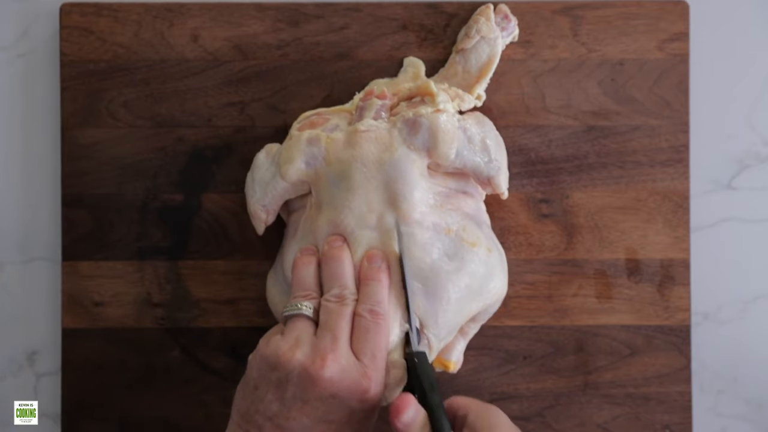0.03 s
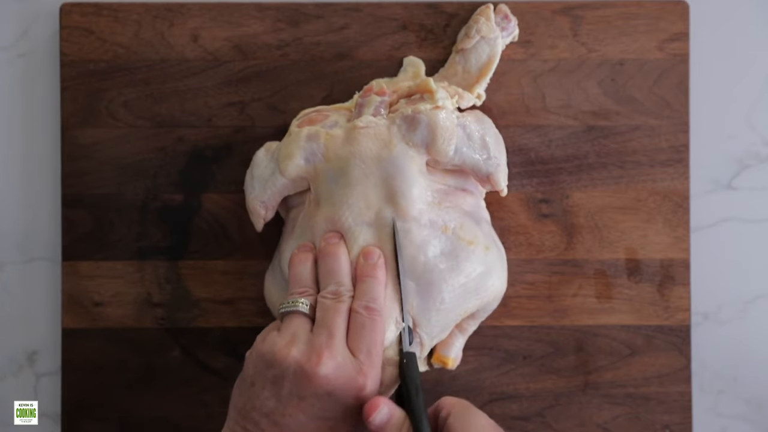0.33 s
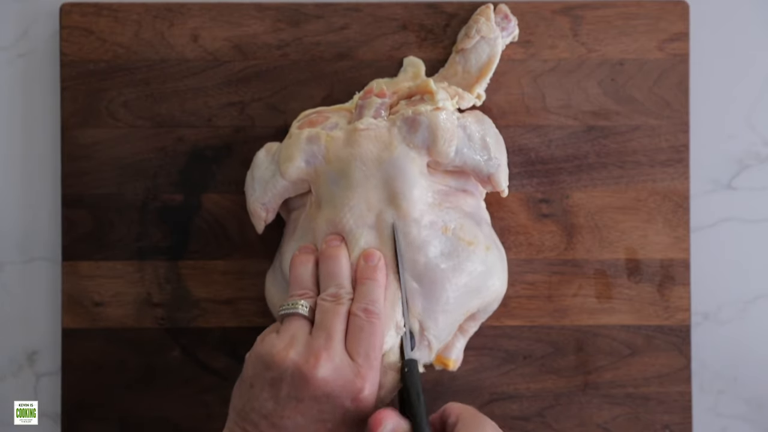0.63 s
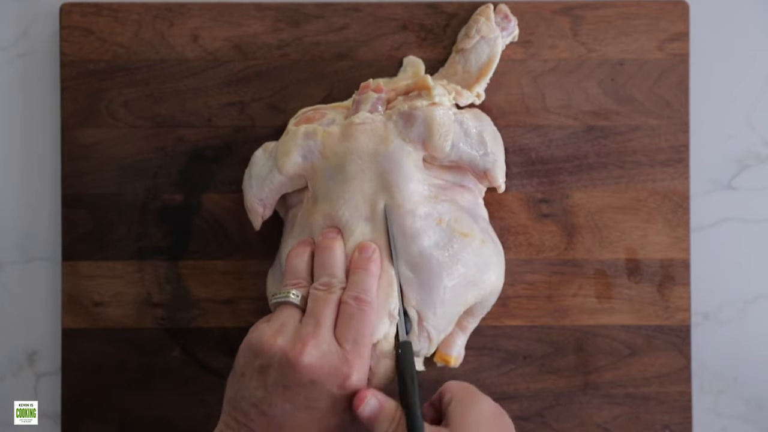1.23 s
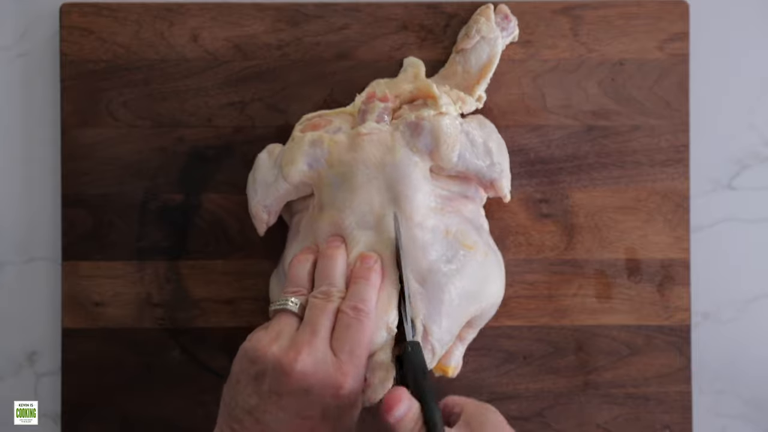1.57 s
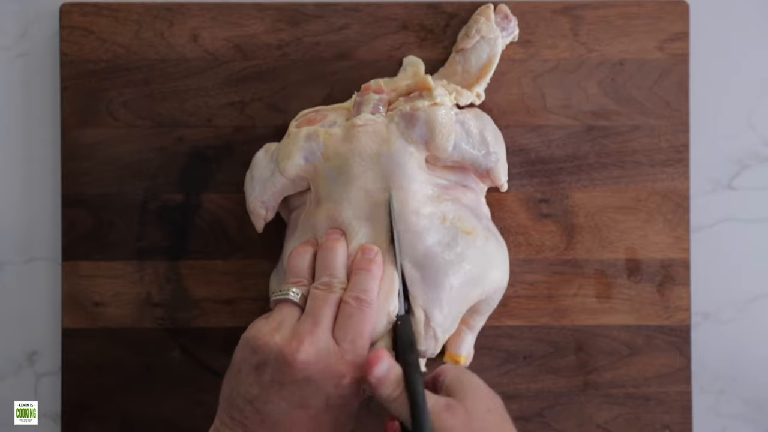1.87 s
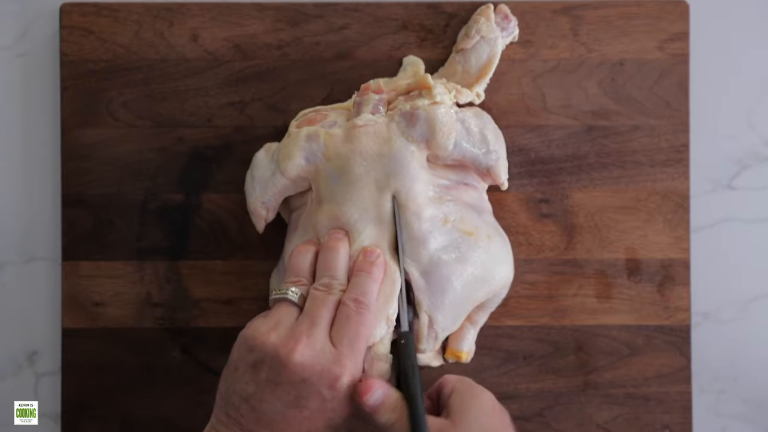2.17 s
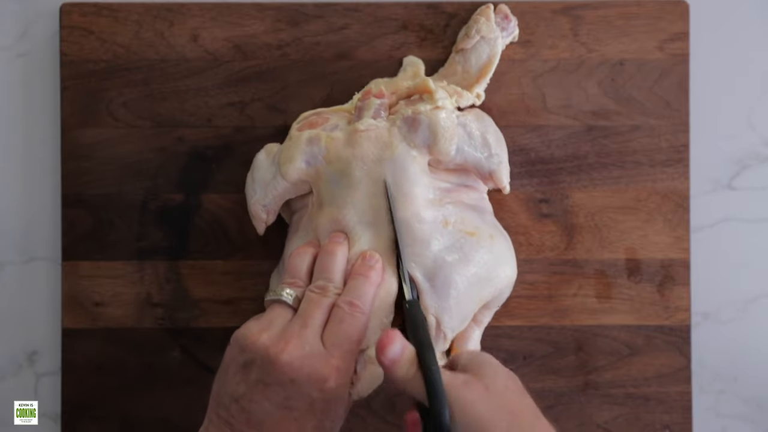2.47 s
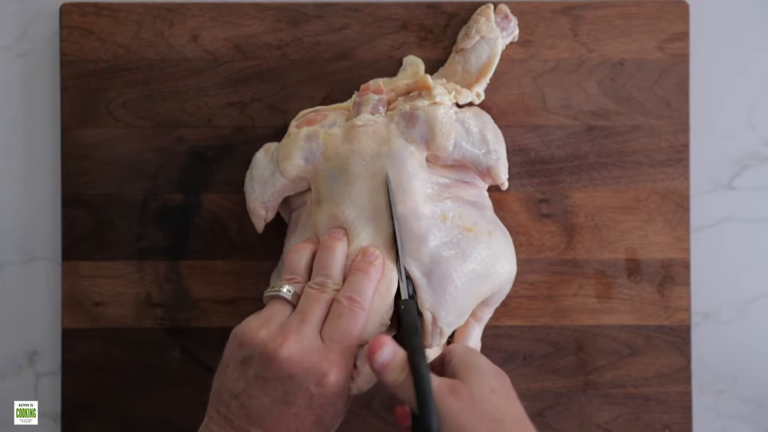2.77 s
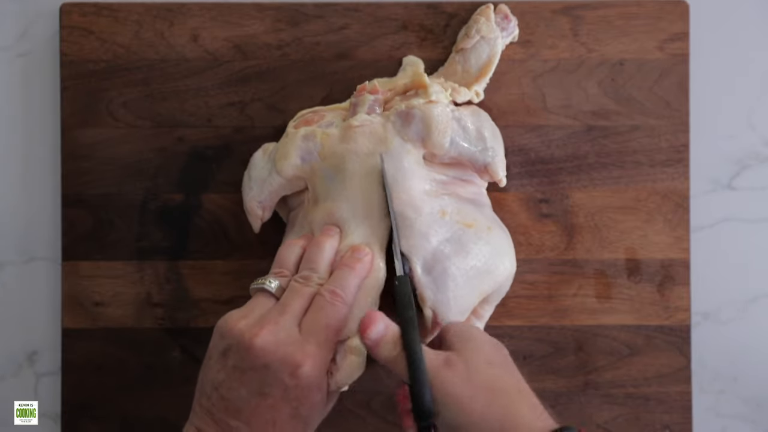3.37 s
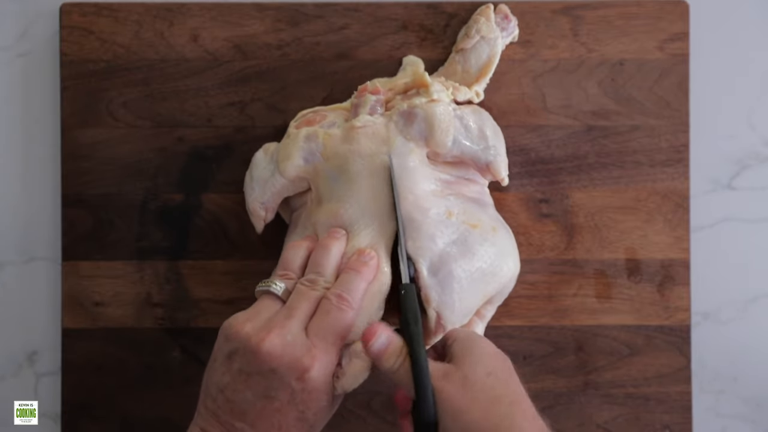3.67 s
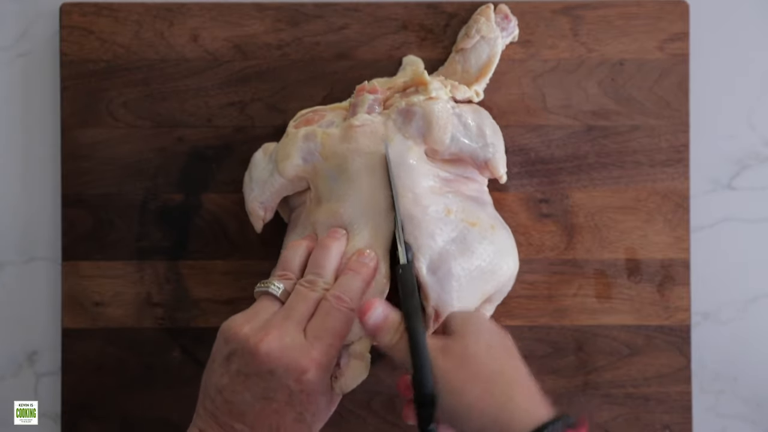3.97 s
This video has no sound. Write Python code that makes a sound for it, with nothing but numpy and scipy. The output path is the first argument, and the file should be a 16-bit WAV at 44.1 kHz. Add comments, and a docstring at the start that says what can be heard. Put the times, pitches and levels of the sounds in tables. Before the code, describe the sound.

Close, irregular snaps and crunches of shears cutting through the bones of a raw chicken.

```python
"""Kitchen shears cut along the backbone of a raw chicken on a wooden board, close by, over a low hum.
From the start ribs snap singly or in crunching runs; each break excites the hollow carcass, whose
pitch rises as the cut opens, and a small kitchen reverberates. Between bites wet skin squelches and
the bird rubs on the wood. Near 1.9 s a bent joint creaks, at 2.6 s the blades rasp through skin,
and from 3.85 s they grind through thick bone by stick-slip friction."""
import sys
import numpy as np
from scipy import signal
from scipy.fft import rfft, irfft
from scipy.io import wavfile

SR = 44100
rng = np.random.default_rng(int(sys.argv[2]) if len(sys.argv) > 2 else 0)


def unload_audio(sound):
    """Save the sound as a 16-bit wav file, at the path given as the first command line argument."""
    columns = np.transpose(np.atleast_2d(sound))
    # keep every value between -1 and 1, then stretch to whole-number steps
    steps = np.round(np.clip(columns, -1, 1) * 32767)
    wavfile.write(sys.argv[1], SR, steps.astype(np.int16))


N = 176400

# Resonances of bone, blades and spitting wet tissue: f/Hz, bandwidth/Hz, level/dB
BONE_MODES = [(1157, 530, -10), (1840, 210, -9.5), (2780, 501, 1.5), (3130, 499, 3), (3766, 490, -4)]
BLADE_MODES = [(4629, 370, 3), (5004, 1090, 1.5), (6280, 1500, -1), (7120, 1200, -5.5)]
SPIT_MODES = [(8400, 4400, -3.5), (10660, 740, 3.5), (12200, 1400, -3.5), (15700, 1200, -7.5)]
BONE_BAND_HZ, BLADE_BAND_HZ, SPIT_BAND_HZ = (800, 4800), (3400, 8800), (7000, 18500)
LEAD_S = 0.02   # time allowed for the build-up to a break


def from_db(db):
    """Amplitude ratio of a level in decibels."""
    return 10 ** (np.asarray(db) / 20)


def unit_rms(x):
    """Normalisation to a root-mean-square value of one."""
    return x / np.sqrt(np.mean(x ** 2) + 1e-20)


def at_hz(points, hz):
    """Interpolation on a logarithmic frequency axis."""
    freqs, values = np.transpose(points)
    return np.interp(np.log(hz + 1), np.log(freqs), values)


def add(out, s, x):
    """Superposition of x on out, starting at s seconds."""
    i = max(int(s * SR), 0)
    out[i:i + len(x)] += x[:max(N - i, 0)]


def band(x, edges_hz):
    """Butterworth band-pass filtering."""
    sos = signal.butter(2, np.clip(edges_hz, 10, .45 * SR), "band", fs=SR, output="sos")
    return signal.sosfilt(sos, x + 1e-18)


def resonate(x, modes, edges_hz, mode_ratio=-1):
    """Modal superposition: x drives damped resonators in parallel, the k-th weighted by mode_ratio ** k."""
    out = 0
    for k, (hz, width, db) in enumerate(modes):
        r = np.exp(-np.pi * width / SR)
        ring = signal.lfilter([1, 0, -1], [1, -2 * r * np.cos(2 * np.pi * hz / SR), r * r], x + 1e-18)
        out = out + mode_ratio ** k * from_db(db) * (1 - r * r) / 2 * ring
    return band(out, edges_hz)


def clicks(size, per_s, spread_db):
    """Shot noise: a Poisson train of impulses of uneven size and sign."""
    chance, strength, sign = rng.random((3, size))
    gain = from_db(spread_db * np.minimum(-np.log(1 - strength), 4))
    return (chance < per_s / SR) * gain * np.sign(sign - .5)


def background():
    """Stationary noise: the room's continuous spectrum plus the single line of an appliance's hum."""
    # Spectral density of the room noise: f/Hz, relative level/dB
    air_spectrum = [(25, -9.5), (60, -3.5), (120, -1.5), (240, -2), (400, -14), (750, -21.5), (1600, -28),
                    (2300, -42), (4300, -38), (6500, -34.5), (10000, -31.5), (16000, -39.5)]
    freqs = np.arange(N // 2 + 1) * SR / N
    air = irfft(rfft(rng.standard_normal(N)) * from_db(at_hz(air_spectrum, freqs)), N)
    hum = np.sqrt(2) * np.sin(2 * np.pi * 118.3 * np.arange(N) / SR)
    return from_db(-49.5) * unit_rms(air) + from_db(-57) * hum


def carcass(force, s):
    """Cavity resonance: the hollow body, tuned as it is at time s, responds together with its board."""
    # Main resonance, higher and sharper as the cut opens: t/s, f/Hz, bandwidth/Hz
    cavity_track = [(0, 546, 106), (.8, 563, 89), (1.5, 597, 54), (1.85, 612, 35), (2.25, 660, 48),
                    (2.6, 729, 37.6), (3.1, 725, 37), (3.68, 730, 80), (3.85, 759, 27)]
    # Side modes of the cavity: ratio to the main frequency, bandwidth/Hz, level/dB
    side_modes = [(0.84, 88.3, -13.5), (1.15, 75, -7)]
    # Modes of the wooden board: f/Hz, bandwidth/Hz, level/dB
    board_modes = [(390, 410, -18.5), (928, 250, -12), (1410, 1200, -36)]
    times, pitches, widths = np.transpose(cavity_track)
    pitch, width = np.interp(s, times, pitches), np.interp(s, times, widths)
    main = (pitch, width, 20 * np.log10(61 / width))   # less damping, taller peak
    sides = [(pitch * ratio, bandwidth, db) for ratio, bandwidth, db in side_modes]
    return resonate(force, [main, *sides, *board_modes], (160, 2000), mode_ratio=0.88)


def fracture(s, push, cracks, levels_db, length_s):
    """Forced response of carcass, bone, blades and tissue; each level is energy spread over length_s."""
    detunes = np.exp(0.023 * rng.standard_normal(3))   # each break rings a little differently
    bodies = (BONE_MODES, BONE_BAND_HZ), (BLADE_MODES, BLADE_BAND_HZ), (SPIT_MODES, SPIT_BAND_HZ)
    parts = [carcass(push, s)]
    for (modes, edges), detune in zip(bodies, detunes):
        parts.append(resonate(cracks, np.array(modes) * [detune, 1, 1], edges))
    return sum(from_db(db) * part * np.sqrt(length_s * SR / (np.sum(part ** 2) + 1e-20))
               for db, part in zip(levels_db, parts))


def snaps():
    """Brittle fracture: a strained rib releases a burst of tiny cracks and shoves the carcass once."""
    # Single breaks: t/s, carcass level/dB, bone level/dB, blade level/dB, spit level/dB
    breaks = [(0.0215, -46, -42, -40.5, -49), (0.041, -37.5, -47.5, -39.5, -49),
              (0.1236, -44, -36, -31, -35), (.239, -48, -50, -45, -45.5), (0.5103, -30, -30, -61, -41),
              (0.5846, -23, -26, -31, -34), (0.5948, -57, -33, -30.5, -48), (0.599, -49, -25.5, -45, -34),
              (0.6167, -43, -30, -29, -51), (0.641, -27.5, -25, -29, -39), (0.658, -59, -44, -38, -47),
              (.694, -45.5, -36.5, -25, -34), (.798, -60, -38.5, -30.5, -39),
              (0.8169, -34.5, -39, -38.5, -43), (0.8208, -36, -32, -48, -40.5),
              (1.0396, -38, -38.5, -45.5, -72), (1.158, -46.5, -47, -43.5, -68),
              (1.2897, -38.5, -34, -42, -41), (1.316, -36, -26.5, -18, -26.5),
              (1.3947, -39.5, -25, -23, -36.5), (1.4294, -50, -43, -41.5, -46.5),
              (1.4387, -47.5, -47, -42, -42), (1.494, -42, -35.5, -26, -31.5),
              (1.5087, -44.5, -38, -42.5, -35.5), (1.525, -21, -14, -15.5, -24),
              (1.752, -36, -22, -23, -33), (1.8306, -20, -20, -22, -26.5), (1.8563, -48, -40, -32.5, -42.5),
              (2.1454, -37.5, -62, -38, -35.5), (2.1621, -30.5, -32.5, -28.5, -36),
              (2.1927, -35.5, -48, -37, -46), (2.198, -21, -22, -27.5, -36), (2.2234, -42, -43, -45, -41),
              (2.228, -17.5, -16, -15.5, -22.5), (2.368, -61, -73, -46, -49),
              (2.466, -31.5, -22.5, -19.5, -29.5), (2.755, -33, -58, -62, -69),
              (2.7689, -26, -37, -35.5, -85), (2.7883, -26, -37, -25, -43), (2.884, -40, -38, -31.5, -23),
              (3.0449, -29, -31, -30.5, -28), (3.065, -40, -34, -27, -27), (3.0727, -18.5, -25, -25.5, -45),
              (3.3449, -51, -33, -37, -28), (3.381, -39.5, -38, -43.5, -33), (3.6778, -21, -29.5, -27, -27),
              (3.6824, -21.5, -24.5, -23, -24), (3.847, -20.5, -36.5, -45, -56),
              (3.8752, -20, -25.5, -28.5, -57), (3.9092, -21.5, -35, -23.5, -31),
              (3.9165, -37, -37, -33, -38), (3.943, -23.5, -24, -20.5, -27), (3.948, -29, -35, -22.5, -24),
              (3.9667, -56, -36, -36, -48)]
    hold_s, decay_s, knock_s = 0.00067, 0.0011, 0.00052
    out, t = np.zeros(N), np.arange(SR // 8) / SR - LEAD_S
    broken, distance_s = t >= 0, np.abs(t)
    strain = from_db(-23.5) * np.exp(-distance_s / 0.003)   # fibres start to tear before the break
    burst = np.exp(-np.maximum(distance_s - hold_s, 0) / decay_s)
    tearing = from_db(-15) * np.exp(-distance_s / 0.0072)   # and keep tearing after it
    envelope = np.where(broken, burst + tearing, strain)
    for s, *levels_db in breaks:
        cracks = envelope * clicks(len(t), per_s=14000, spread_db=-1.0)
        push = broken * np.exp(-distance_s / knock_s) + 0.25 * cracks
        add(out, s - LEAD_S, fracture(s, push, cracks, levels_db, length_s=0.0046))
    return out


def kitchen(x):
    """Reverberation decays exponentially in each band: lows keep their pitch, treble diffuses to hiss."""
    # Strength of the reverberant field: f/Hz, level/dB
    room_levels = [(200, -11), (700, -25.5), (1500, -18), (3500, -24.5), (8000, -16), (14000, -23.5)]
    # Reverberation time: f/Hz, T60/s
    room_t60 = [(200, 0.19), (1000, 0.16), (4000, 0.14), (9000, 0.28), (15000, .33)]
    build_up_s, diffuse_hz = 0.0063, 2000
    out, t = 0, np.arange(SR // 2) / SR
    edges = np.geomspace(100, 18000, 15)
    for low, high in zip(edges, edges[1:]):
        hz = np.sqrt(low * high)
        fade = from_db(-60 * t / at_hz(room_t60, hz)) * (1 - np.exp(-t / build_up_s))
        fade /= np.sqrt(np.sum(fade ** 2))
        direct, noise = band(x, (low, high)), rng.standard_normal(N)
        if hz < diffuse_hz:
            tail = signal.fftconvolve(direct, fade * noise[:len(t)])[:N]
        else:
            power = np.abs(signal.fftconvolve(direct ** 2, fade ** 2)[:N])
            tail = np.sqrt(power) * unit_rms(band(noise, (low, high)))
        out = out + from_db(at_hz(room_levels, hz)) * tail
    return out


def crunches():
    """Progressive fracture: cartilage gives way in a dense run of small breaks."""
    # Runs of breaks: t/s, duration/s, carcass level/dB, bone level/dB, blade level/dB, spit level/dB
    runs = [(0.112, 0.024, -48, -47.5, -44, -55), (.385, 0.022, -45.5, -47.5, -50.5, -58),
            (1.391, 0.006, -40.5, -28.5, -31, -35.5), (.497, 0.015, -33.5, -40, -40, -44),
            (0.639, 0.017, -34.5, -46, -32, -46), (2.594, 0.032, -34, -47.5, -48, -66),
            (2.757, 0.038, -34.5, -74, -75.5, -61), (3.044, 0.013, -31, -38, -36.5, -45),
            (3.072, 0.018, -25, -35.5, -36, -29), (3.285, 0.037, -50, -52, -50, -50.5),
            (3.677, 0.0057, -17.5, -48, -26.5, -22.5)]
    out, t = np.zeros(N), np.arange(SR // 8) / SR - LEAD_S
    for s, length, *levels_db in runs:
        envelope = np.exp(np.minimum(t, 0) / (0.15 * length) - np.maximum(t - length, 0) / (0.25 * length))
        cracks = envelope * clicks(len(t), per_s=3100, spread_db=0.5)
        add(out, s - LEAD_S, fracture(s, cracks, cracks, levels_db, length))
    return out


def squelches():
    """Modulated shot noise: wet skin and flesh crackle in clumps as they slide on the blades."""
    # Slides: peak t/s, 20 dB rise/s, 20 dB fall/s, carcass level/dB, blade and bone level/dB, spit level/dB
    slides = [(0.172, 0.1, 0.18, -44, -65.5, -60), (0.528, 0.14, 0.043, -47, -53.5, -54),
              (.66, 0.17, 0.043, -52, -43, -41), (0.851, 0.042, 0.037, -45.5, -54.5, -48.5),
              (1.15, 0.4, 0.09, -53.5, -63, -56), (1.299, 0.064, 0.056, -45.5, -53, -51),
              (1.371, 0.01, 0.039, -38, -47, -43), (1.425, 0.071, 0.041, -42, -52, -48.5),
              (1.569, 0.18, 0.22, -43, -60.5, -52.5), (2.149, 0.013, 0.08, -41, -45, -50),
              (2.235, 0.046, 0.082, -32.5, -57, -38.5), (2.41, 0.071, 0.1, -53, -64, -60.5),
              (3.088, 0.05, 0.062, -35, -40, -34.5), (3.36, 0.06, 0.08, -44, -48, -42.5),
              (3.688, 0.062, 0.084, -35, -47.5, -42)]
    clump_spread_db, clump_s = 5, 0.0066
    out, t = np.zeros(N), np.arange(N) / SR
    clumps = from_db(clump_spread_db * np.interp(t / clump_s, np.arange(N), rng.standard_normal(N)))
    crackle = clumps * clicks(N, per_s=2600, spread_db=1.5)
    blade = unit_rms(resonate(crackle, BLADE_MODES, BLADE_BAND_HZ))
    bone = from_db(1) * unit_rms(resonate(crackle, BONE_MODES, BONE_BAND_HZ))
    spit = unit_rms(resonate(crackle, SPIT_MODES, SPIT_BAND_HZ))
    for s, rise, fall, body_db, ticks_db, spit_db in slides:
        on = (t > s - 2 * rise) & (t < s + 2 * fall)
        swell = from_db(-20 * np.maximum((s - t[on]) / rise, (t[on] - s) / fall))
        body = from_db(body_db) * unit_rms(carcass(crackle[on], s))
        ticks = from_db(ticks_db) * (blade[on] + bone[on])
        out[on] += swell * (body + ticks + from_db(spit_db) * spit[on])
    return out


def rubs():
    """Sliding friction of flesh on wood gives soft swells of low, narrow-band noise."""
    # The hand shifts the bird on the board: peak t/s, half-length/s, level/dB
    shifts = [(0.322, 0.18, -60), (0.984, 0.18, -48.5), (3.268, 0.092, -43.5)]
    t, band_hz = np.arange(N) / SR, (201, 308)
    swell = sum(from_db(db) * np.exp(-((t - s) / half) ** 2) for s, half, db in shifts)
    return swell * unit_rms(band(band(rng.standard_normal(N), band_hz), band_hz))


def creak():
    """Stick-slip in a bent joint gives a rough, slightly rising tone near the carcass's own pitch."""
    # Course of the creak: t/s, f/Hz, level/dB
    bend = [(1.85, 610, -60), (1.87, 622, -39.5), (1.885, 620, -50.5), (1.906, 705, -38), (1.917, 675, -44),
            (1.928, 690, -41.5), (1.955, 700, -68)]
    times, hz, db = np.transpose(bend)
    t, bandwidth_hz = np.arange(N) / SR, 45
    pole = np.exp(-np.pi * bandwidth_hz / SR)
    sway = unit_rms(signal.lfilter([1], [1, -pole], rng.standard_normal((2, N))))
    phase = 2 * np.pi * np.cumsum(np.interp(t, times, hz)) / SR
    tone = sway[0] * np.sin(phase) + sway[1] * np.cos(phase)   # amplitude and phase wander
    on = (t > times[0]) & (t < times[-1])
    return on * from_db(np.interp(t, times, db)) * tone / tone[on].std()


def slicing():
    """Friction of edge on edge excites the blades' modes as they rasp through skin in one slice."""
    # Envelope of the slice: t/s, level/dB
    stroke = [(2.576, -69), (2.59, -37.5), (2.602, -28), (2.614, -41), (2.63, -53), (2.66, -56)]
    # Resonances of the sliding blades: f/Hz, bandwidth/Hz, level/dB
    edge_modes = [(2760, 300, -7), (3950, 490, 3), (5240, 780, -3), (7300, 1300, -4.5), (10100, 1800, -4.5),
                  (15100, 1300, -10)]
    times, db = np.transpose(stroke)
    t = np.arange(N) / SR
    scrape = resonate(clicks(N, per_s=12000, spread_db=2), edge_modes, (1500, 17000))
    on = (t > times[0]) & (t < times[-1])
    return on * from_db(np.interp(t, times, db)) * unit_rms(scrape)


def grind():
    """Stick-slip through thick bone: nearly periodic slips and fine grit set the closing steel ringing."""
    # Course of the grind: t/s, carcass level/dB, steel level/dB, spit level/dB
    bite = [(3.853, -22, -29.5, -61), (3.866, -19.5, -29.5, -51), (3.884, -17.5, -25.5, -42),
            (3.902, -22, -23, -40), (3.926, -26, -25, -40), (3.931, -45.5, -42.5, -53),
            (3.957, -28.5, -45, -58), (3.966, -51, -27, -54), (3.978, -51, -47, -62)]
    # Resonances of the steel shears: f/Hz, bandwidth/Hz, level/dB
    steel_modes = [(1120, 100, -22), (2010, 190, 1.5), (2580, 220, 5.5), (3240, 67, 11), (4360, 240, 1),
                   (5110, 190, 5.5), (5750, 420, 0.5), (6500, 400, -6.5), (7200, 340, -9), (8540, 71, -3),
                   (9800, 170, -4.5)]
    slips_per_s, jitter = 210, 0.3
    times, *levels_db = np.transpose(bite)
    out, t = np.zeros(N), times[0] + np.arange(SR // 5) / SR
    gaps, sizes = rng.standard_normal((2, 50))
    slip_s = np.cumsum(np.exp(jitter * gaps)) / slips_per_s
    slips = np.zeros(len(t))
    slips[np.minimum((slip_s * SR).astype(int), len(t) - 1)] = from_db(2.2 * sizes)
    grit = from_db(-1.5) * unit_rms(clicks(len(t), per_s=9500, spread_db=0.7))
    cutting = t < times[-1]
    force = cutting * (unit_rms(slips) + grit)
    body = carcass(band(force, (580, SR)), times[0])
    steel = resonate(force, steel_modes, (650, 9000))
    spit = resonate(force, SPIT_MODES, SPIT_BAND_HZ)
    for db, part in zip(levels_db, (body, steel, spit)):
        add(out, times[0], from_db(np.interp(t, times, db)) * part / part[cutting].std())
    return out


def scene():
    """Superposition of direct sound, reverberation and background, the same in both channels."""
    cutting = snaps() + crunches() + grind() + squelches() + creak() + slicing()
    return np.tile(cutting + kitchen(cutting) + rubs() + background(), (2, 1))


def record(dry):
    """Soft saturation rounds the loudest peaks; a steep low-pass filter removes the highest treble."""
    low_pass = signal.ellip(10, .1, 80, 15800, fs=SR, output="sos")
    return signal.sosfilt(low_pass, np.tanh(dry))


dry = scene()
out = record(dry)
unload_audio(out)
```